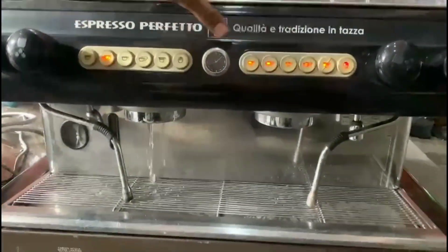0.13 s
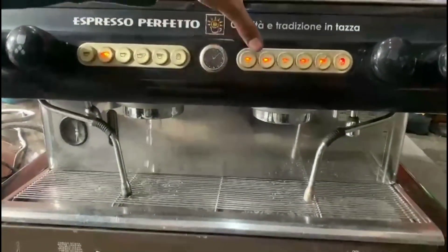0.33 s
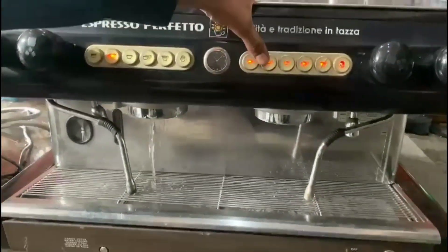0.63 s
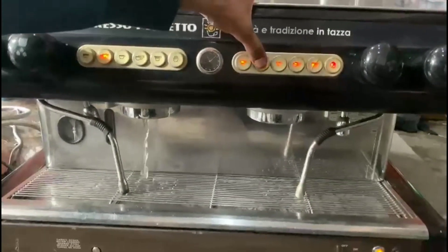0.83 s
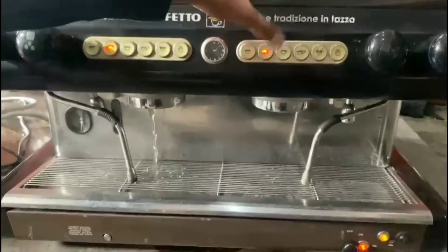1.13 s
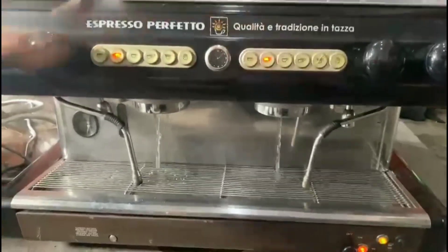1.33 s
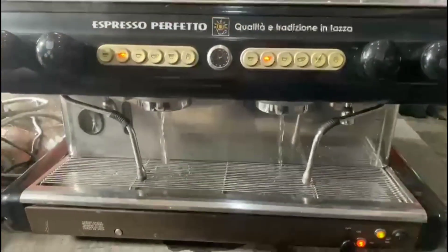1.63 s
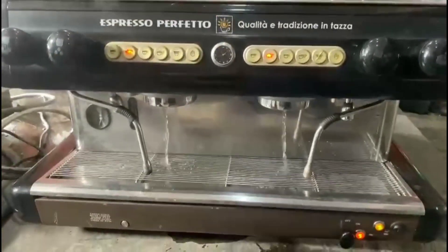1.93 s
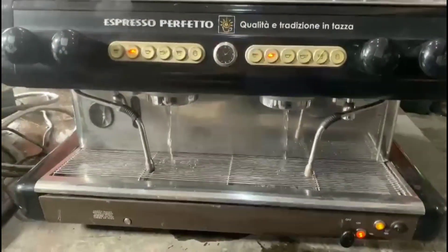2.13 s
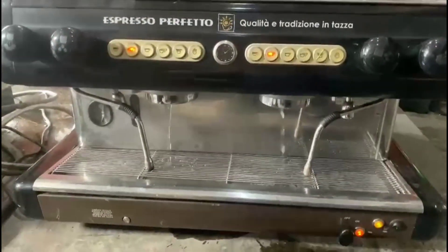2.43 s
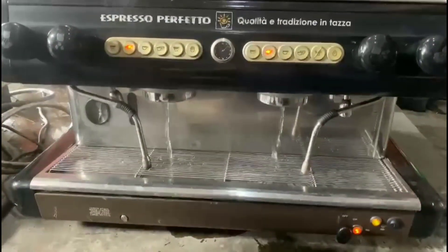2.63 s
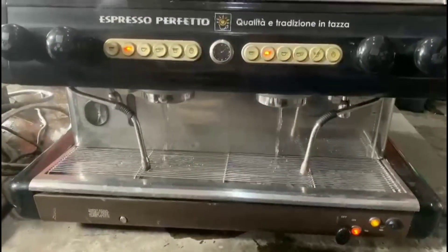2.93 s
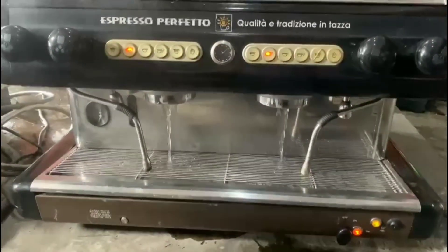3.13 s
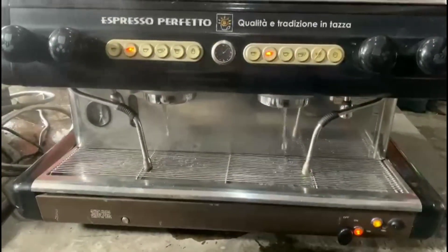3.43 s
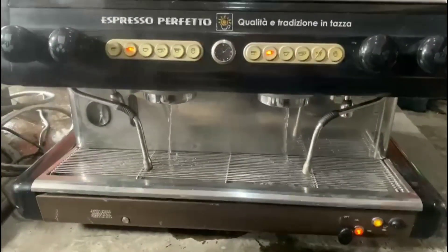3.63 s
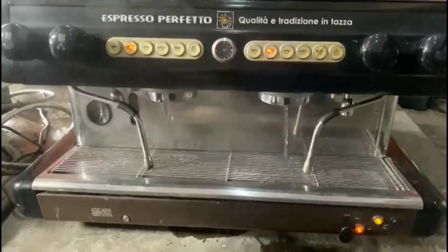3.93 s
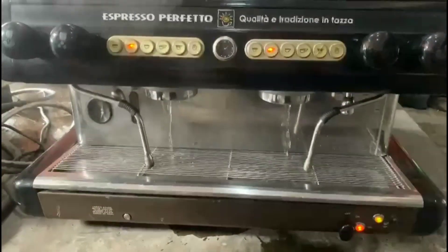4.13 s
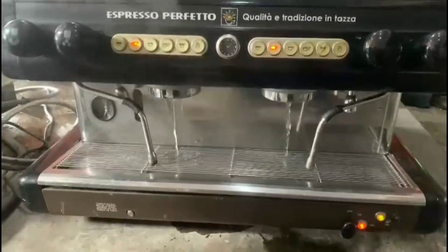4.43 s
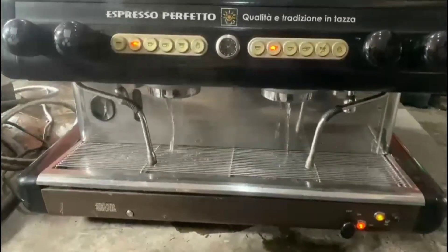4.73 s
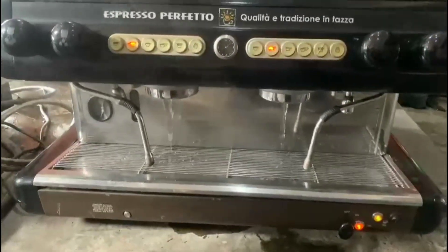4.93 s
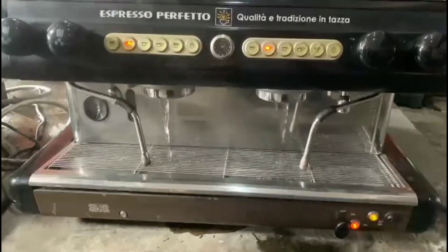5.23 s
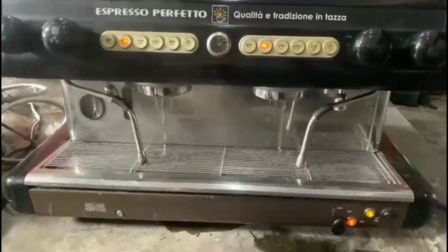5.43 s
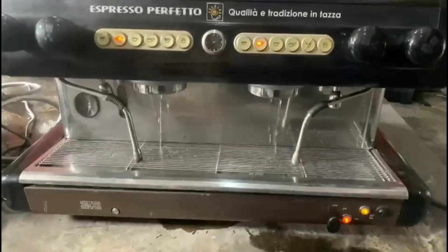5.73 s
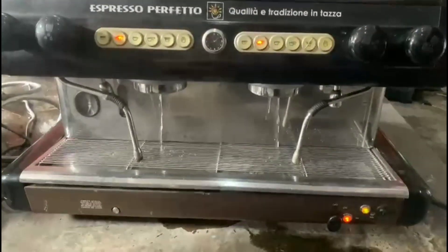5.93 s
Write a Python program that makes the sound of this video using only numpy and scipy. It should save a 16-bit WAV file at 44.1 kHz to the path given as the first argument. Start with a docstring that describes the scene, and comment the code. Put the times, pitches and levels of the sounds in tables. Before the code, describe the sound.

In a hard, echoing workshop, a coffee machine flushes water: a low, wavering pump drone, a buzzing casing and a fine spatter of drops on a grid run throughout. One crisp valve click comes early. Past the midpoint come short scuffs and a handful of irregular knocks, the loudest and brightest near the end. A hand-held phone hears it from under a metre, drifting back and then a little closer.

```python
"""An espresso machine flushes hot water: its pump hums and rattles the casing as drops patter on the grid.
A valve snaps open about a second in. Short scuffs hiss, and later dull knocks off to the side
ring round the hard, echoing workshop. A hand-held phone with two microphones hears it all,
backing away from the machine and then coming a little closer."""
import sys
import numpy as np
from scipy import signal
from scipy.fft import rfft, irfft, next_fast_len
from scipy.io import wavfile
from scipy.ndimage import uniform_filter1d

SR = 44100
rng = np.random.default_rng(int(sys.argv[2]) if len(sys.argv) > 2 else 0)


def waveform_to_disk(signal):
    """Save audio, clipped to [-1, 1], as 16-bit WAV at the path in sys.argv[1]."""
    frames = np.transpose(np.atleast_2d(signal))
    scaled = np.clip(frames, -1, 1) * 32767
    samples = np.round(scaled).astype(np.int16)
    wavfile.write(sys.argv[1], SR, samples)


N = 268789
TIME = np.arange(N) / SR
SIZE = next_fast_len(N + SR)
FREQ = np.arange(SIZE // 2 + 1) * SR / SIZE
SHAFT_HZ = 49.7  # turns of the pump each second


def undb(db):
    return 10 ** (np.asarray(db) / 20)


def set_level(x, db):
    return x * undb(db) / np.sqrt(np.mean(x ** 2))


def white_noise():
    return rng.standard_normal(N)


def look_up(table, hz):
    """Read between the rows of a (Hz, value) table, with octaves evenly spaced."""
    pitches, values = np.transpose(table)
    return np.interp(np.log(np.maximum(hz, 1)), np.log(pitches), values)


def filtered(x, gain):
    """Give each frequency of a sound its own gain."""
    return irfft(rfft(x, SIZE) * gain, SIZE)[..., :N]


def wander(rate):
    """A smooth random curve, about 1 either way, with `rate` new values a second."""
    hold = int(SR / rate)
    steps = np.repeat(rng.standard_normal(N // hold + 1), hold)
    return 1.3 * uniform_filter1d(uniform_filter1d(steps, hold), hold)[:N]


def swell(middle_s, length_s):
    """A smooth rise to 1 and back."""
    return np.exp(-((TIME - middle_s) / length_s * 2) ** 2)


def add(track, start_s, sound):
    i = int(start_s * SR)
    track[i:i + len(sound)] += sound[:N - i]


def right_delay(lag_ms):
    """A filter that makes the right side late."""
    return np.exp(-2j * np.pi * FREQ * np.array([[0], [lag_ms / 1000]]))


# How alike the two microphones sound. Each row: frequency in Hz, shared part from 0 to 1.
SHARED_SOUND = [(60, 0.96), (200, 0.96), (330, 0.38), (700, 0.47), (1200, 0.62), (2200, 0.033),
                (4000, 0.031), (5500, 0.2), (6200, 0.88), (6700, 1), (7150, 1), (7600, 0.98), (8000, 0.49),
                (10000, 0.45)]


def stereo(source, lag_ms):
    """Both microphones hear a shared part, late on the right, and a part the room scatters."""
    share = np.clip(look_up(SHARED_SOUND, FREQ), 0, 1)
    shared = filtered(source(), np.sqrt(share) * right_delay(lag_ms))
    return shared + filtered(np.array([source(), source()]), np.sqrt(1 - share))


def flickering(sound, colour, flicker_db, rate):
    """Give a sound its tone colour, and let each half octave flicker on its own."""
    spectrum, out = rfft(sound, SIZE) * undb(look_up(colour, FREQ)), 0
    half_octaves = 2 * np.log2(np.maximum(FREQ, 1))
    for k in np.arange(np.floor(2 * np.log2(colour[0][0])), np.ceil(2 * np.log2(colour[-1][0])) + 1):
        band = irfft(spectrum * np.clip(1 - abs(half_octaves - k), 0, 1), SIZE)[:, :N]
        out = out + band * undb(flicker_db * wander(rate))
    return set_level(out, 0)


def ring(notes, length_s=.3, scatter_s=0):
    """A struck thing rings with fading notes, whose strengths vary from blow to blow."""
    hz, db, fade_s = np.transpose(notes)[:, :, None]
    t = np.maximum(np.arange(int(length_s * SR)) / SR - scatter_s * rng.random(hz.shape), 0)
    direction = (-1) ** np.arange(len(hz))[:, None]  # neighbours swing opposite ways
    weight = direction * undb(db + 1.27 * rng.standard_normal(hz.shape))
    out = np.sum(weight * np.sin(2 * np.pi * hz * t) * np.exp(-np.log(1000) * t / fade_s), axis=0)
    return out / abs(out).max()


# Where the phone is. Each row: time in seconds, distance from the machine in metres.
PHONE_PATH = [(0, 0.64), (1.3, 0.72), (3.1, 0.95), (6.09, 0.84)]


def distance_gain(db_at_1m, fall):
    """Further away is quieter: `fall` is 1 in open air and less in an echoing room."""
    metres = np.interp(TIME, *np.transpose(PHONE_PATH))
    return undb(db_at_1m) * metres ** -fall


# The pump's low rumble. Each row: frequency in Hz, relative strength in dB.
RUMBLE_COLOUR = [(12, -68), (20, -33), (41, -9.5), (70, -3), (102, -0.5), (123, -2.5), (135, -0.5),
                 (155, -4.5), (181, -7), (221, -13.5), (260, -21), (340, -32), (570, -120)]
# Motor and vane tones. Each row: pitch in Hz, width in Hz, level in dB at one metre.
PUMP_TONES = [(52.4, 17, -59.5), (98.1, 10.4, -44.5), (151.6, 9.6, -43.5), (168.2, 16.3, -46),
              (394.6, 19, -62.5), (523, 1.7, -65), (708.7, 25, -55.5), (1348, 25, -60), (1562, 6.4, -63.5)]
# Brief dips in the hum. Each row: middle in seconds, length in seconds, change in dB.
HUM_DIPS = [(1.345, 1, -1), (4.86, 1, -3)]


def pump_hum():
    """The pump's motor and vanes make wavering tones over a low rumble."""
    rumble = flickering(stereo(white_noise, lag_ms=0.043), RUMBLE_COLOUR, flicker_db=0.5, rate=37)
    noise, tones = stereo(white_noise, lag_ms=.14), 0
    for hz, width_hz, db in PUMP_TONES:
        narrow_peak = 1 / (1 + ((FREQ - hz) / width_hz * 2) ** 2)
        tones = tones + set_level(filtered(noise, narrow_peak), db)
    dip_db = sum(db * swell(middle_s, length_s) for middle_s, length_s, db in HUM_DIPS)
    return (undb(-38) * rumble + tones) * distance_gain(dip_db, fall=0.68)


# The shaking casing. Each row: frequency in Hz, relative strength in dB.
CASING_COLOUR = [(120, -20), (200, 0.5), (223, -10), (253, -1), (381, -2), (457, -7.5), (509, -4),
                 (624, -6), (702, -2), (825, -13), (979, -7), (1350, -11), (1490, -12), (1620, -10.5),
                 (2600, -24), (3380, -57), (5720, -120)]


def casing_rattle():
    """The pump shakes the casing, a little harder once every turn of its shaft."""
    shaft_hz = SHAFT_HZ * (1 + 0.0045 * wander(0.72))
    turn = np.cos(2 * np.pi * np.cumsum(shaft_hz) / SR)
    shaking = stereo(lambda: (1 + 0.096 * turn) * white_noise(), lag_ms=0.11)
    return distance_gain(-44, fall=0.53) * flickering(shaking, CASING_COLOUR, flicker_db=2.18, rate=12)


# Water hitting the drip grid. Each row: frequency in Hz, relative strength in dB.
SPLASH_COLOUR = [(1500, -16), (2000, -5), (3000, 3.5), (3500, 2.5), (4200, -1), (5500, -6), (6200, -4.5),
                 (7500, -7.5), (9500, -6.5), (10300, -14), (11600, -32.5)]


def water_patter(drops_per_s=1500):
    """Small drops hit the grid over a fine hiss; the uneven flow throbs twice a shaft turn."""
    def drops():
        hits = (rng.random(N) < drops_per_s / SR) * undb(2.2 * rng.exponential(size=N))
        spray = signal.lfilter([1], [1, -.985], hits) * white_noise()  # each hit is a tiny fading burst
        return throb * (set_level(spray, -4.5) + white_noise())
    throb = undb(.6 * wander(15)) * (1 + .05 * np.cos(4 * np.pi * SHAFT_HZ * TIME))
    splash = flickering(stereo(drops, lag_ms=.49), SPLASH_COLOUR, flicker_db=2.22, rate=28)
    return distance_gain(-56, fall=0.47) * splash


# Scuffs. Each row: middle in seconds, length in seconds, level in dB, pitch in Hz, width in octaves.
SCUFF_SWELLS = [(0.665, 1, -63.5, 8230, 0.057), (4.005, 0.12, -48.5, 4100, 1),
                (4.328, 0.19, -37.5, 440, 0.78), (5.31, 0.14, -57, 8500, 0.12),
                (5.328, 0.1, -45.5, 3480, 1), (5.424, 0.071, -43, 2340, 1),
                (5.425, 0.023, -45, 3310, 0.055), (5.696, 0.12, -56, 2380, 0.23),
                (5.985, 0.085, -59, 8200, 0.21), (6.063, 0.31, -53, 3980, 1)]


def scuffs():
    """Each scuff is a gritty hiss that swells and fades around one pitch."""
    out, grit = 0, undb(2.2 * wander(180)) * stereo(white_noise, lag_ms=.49)
    for middle_s, length_s, db, hz, octaves in SCUFF_SWELLS:
        hiss = filtered(grit, np.exp(-(np.log2(np.maximum(FREQ, 1) / hz) / octaves) ** 2))
        out = out + set_level(hiss, db) * swell(middle_s, length_s)
    return out


# The valve's brass body. Each row: pitch in Hz, relative strength in dB, seconds to fade by 60 dB.
VALVE_NOTES = [(710, -0.5, 0.0077), (1040, -0.5, 0.015), (1470, 2.5, 0.014), (1920, 1, 0.015),
               (2277, 0.5, 0.018), (2550, -5, 0.012), (3260, 4, 0.0051), (3900, 5, 0.0095),
               (4170, 2.5, 0.013), (4500, 0.5, 0.014), (7100, 6, 0.0016), (8340, -2.5, 0.018),
               (9000, -4, 0.0075), (10600, 2, 0.0023)]


def valve_snap(start_s=.9525, rise_s=0.00054, hold_s=0.0066, fade_s=0.021):
    """A magnet slams the valve's plunger, which chatters on its seat and rings the brass body."""
    t, out = TIME[:int(.1 * SR)], np.zeros(N)
    loudness = np.minimum(t / rise_s, 1) * np.exp(-np.maximum(t - hold_s, 0) / fade_s)
    chatter = rng.standard_normal(len(t)) * loudness
    body = np.convolve(chatter, ring(VALVE_NOTES, length_s=.05))[:len(t)]
    snap = body / abs(body).max() + undb(-20) * chatter / abs(chatter).max()
    add(out, start_s, undb(-16) * snap)
    return out


def favour(notes, centre_hz, octaves):
    """The same notes, weaker the further they lie from a centre pitch."""
    hz, db, fade_s = np.transpose(notes)
    return np.transpose([hz, db - 6 * (np.log2(hz / centre_hz) / octaves) ** 2, fade_s])


def blow(notes, centre_hz, rise_s, crack_fade_s=.003):
    """One blow rings and cracks; harder blows ring higher and crack more."""
    t = TIME[:int(.3 * SR)]
    dull_noise = signal.lfilter(*signal.butter(3, 5000, fs=SR), rng.standard_normal(len(t)))
    crack = dull_noise * np.exp(-np.maximum(t - rise_s, 0) / crack_fade_s)
    crack_db = -41.5 + 37 * np.log2(centre_hz / 800)
    sound = (ring(notes, scatter_s=rise_s) + undb(crack_db) * crack) * np.minimum(t / rise_s, 1) ** 2
    return sound / abs(sound).max()


# The knocked thing's ring, then its low thud.
# Each row: pitch in Hz, relative strength in dB, seconds to fade by 60 dB.
RING_NOTES = [(400, -11, 0.024), (509, -2.5, 0.037), (601, -0.5, 0.051), (728, 0.5, 0.056),
              (784, -3, 0.032), (897, 1.5, 0.024), (978, 3.5, 0.026), (1090, 0, 0.031), (1200, -6, 0.019),
              (1360, 2, 0.028), (1460, 4, 0.021), (1690, 7, 0.027), (1804, 1, 0.02), (1958, 3.5, 0.012),
              (2130, 2, .012), (2280, -9, 0.011), (2530, -5, 0.011), (2660, -4, .014), (2807, 1, 0.028),
              (2900, 1.5, 0.027), (3300, -3.5, 0.0071), (3710, -9.5, 0.013), (4040, -7, 0.01),
              (4740, -12, .006), (5200, -9, .008), (6240, 1, 0.014)]
THUD_NOTES = [(124, -3, 0.014), (193, -2.5, 0.028), (268.8, -3.5, 0.029), (288, -13, 0.063)]
# The knocks. Each row: start in seconds, level in dB, thud in dB next to the blow, thud pitch factor,
# ring pitch factor, ring centre in Hz, ring width in octaves, change to the high notes in dB,
# first echo in dB next to the blow, rise time in seconds.
KNOCK_HITS = [(3.599, -23, 2, 0.93, 0.87, 620, 1.3, -14, -8, 0.003),
              (3.946, -13, 0.5, 0.97, 0.95, 750, 1.23, -7.5, -12.5, .004),
              (4.287, -20.5, -3.5, 1.5, 1.018, 480, 0.94, 0, -15, 0.0054),
              (4.307, -34, 7.5, 1.28, 1.1, 450, 0.65, 0, -23, 0.0029),
              (4.754, -1.5, -9, 1.114, 1.0, 1213, 1.47, 0.5, -12, .008),
              (5.916, -14, -5, 1.1, 0.992, 820, 0.73, 26, -3.5, .004)]


def knocks(echo_gap_s=.021, echo_loss_db=5.5, fade_in_s=.002):
    """A low thud follows each blow, and facing walls throw the ring to and fro."""
    out = np.zeros((2, N))
    fade_in = np.minimum(TIME[:int(.3 * SR)] / fade_in_s, 1)
    for start_s, db, thud_db, thud_pitch, ring_pitch, hz, octaves, high_db, echo_db, rise_s in KNOCK_HITS:
        knock, thud = np.zeros((2, N))
        notes = favour(RING_NOTES * np.array([ring_pitch, 1, 1]), hz, octaves)
        notes[:, 1] += high_db * (notes[:, 0] > 2200)
        add(knock, start_s, blow(notes, hz, rise_s))
        low_ring = ring(THUD_NOTES * np.array([thud_pitch, 1, 1])) * fade_in
        add(thud, start_s + rise_s + .0005, undb(thud_db) * low_ring)
        # the walls return mostly the middle notes, which fade sooner
        echo_notes = favour(notes, centre_hz=815, octaves=0.32) * [1, 1, 0.73]
        for k in range(4):
            echo = ring(echo_notes, scatter_s=.003) * fade_in
            echo_s = start_s + rise_s / 2 - fade_in_s + (k + 1) * echo_gap_s
            add(knock, echo_s, undb(echo_db - k * echo_loss_db) * echo / abs(echo).max())
        direct, into_room = knock + thud, undb(-3.5) * (knock + undb(-6.5) * thud)
        out += undb(db) * np.array([direct, into_room])
    bass_cut = signal.butter(2, 45, "high", fs=SR, output="sos")
    return signal.sosfilt(bass_cut, out)  # the microphones barely pick up the knocks' deepest bass


# How long the workshop rings. Each row: frequency in Hz, seconds to fade by 60 dB.
ROOM_FADE = [(100, 0.22), (500, 0.34), (900, 0.24), (1500, 0.58), (4000, 0.6), (10000, 0.065)]


def room(direct, into_room, lag_ms):
    """The direct sound comes first, then a wash of echoes that fades at its own rate in each octave."""
    t, tail = TIME[:SR], 0
    noise = stereo(white_noise, lag_ms)
    for hz in 63 * 2. ** np.arange(8):
        band = filtered(noise, np.clip(1 - abs(np.log2(np.maximum(FREQ, 1) / hz)), 0, 1))[:, :SR]
        tail = tail + band * np.exp(-np.log(1000) * t / look_up(ROOM_FADE, hz))
    tail = tail * np.minimum(t / 0.0016, 1)
    echoes = rfft(tail / np.sqrt(np.sum(tail ** 2) / 2), SIZE)
    return filtered(direct, right_delay(lag_ms)) + filtered(into_room, echoes)


def scene():
    """All the sounds at the two microphones."""
    snap = valve_snap()
    hits = room(*knocks(), lag_ms=0.25) + room(snap, undb(-14) * snap, lag_ms=0.41)
    return pump_hum() + casing_rattle() + water_patter() + scuffs() + hits


# The opening of the right microphone. Each row: frequency in Hz, boost or cut in dB.
RIGHT_MIC_COLOUR = [(100, -0.5), (350, 2), (1000, 1.5), (7400, -1), (8200, 10.5), (9000, 13), (10000, 3),
                    (10400, -1.5), (10800, -8)]


def record(dry, top_hz=11600):
    """A hollow at the right microphone lifts the high treble; the phone cuts off what lies above."""
    right = filtered(dry[1], undb(look_up(RIGHT_MIC_COLOUR, FREQ)))
    treble_cut = signal.ellip(10, .2, 60, top_hz, fs=SR, output="sos")
    return signal.sosfilt(treble_cut, np.array([dry[0], right]))


dry = scene()
out = record(dry)
waveform_to_disk(out)
```